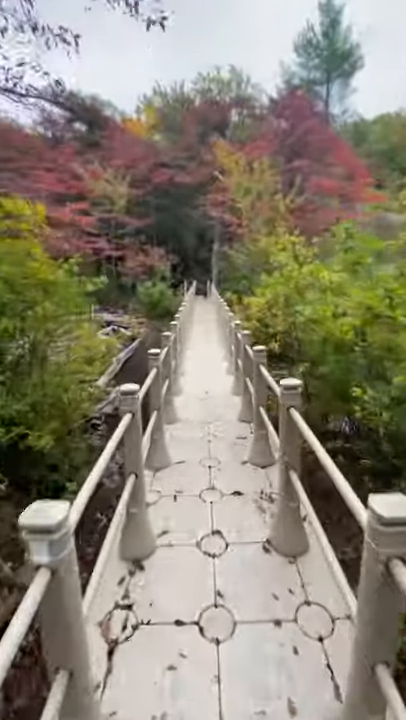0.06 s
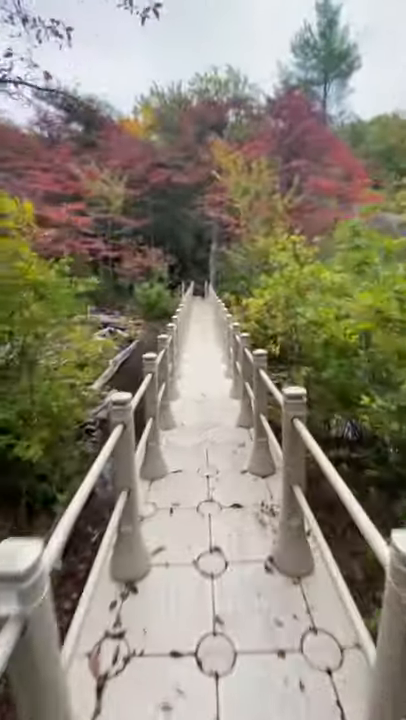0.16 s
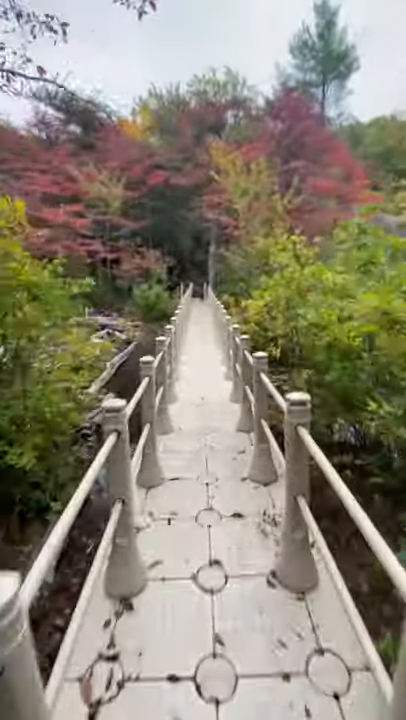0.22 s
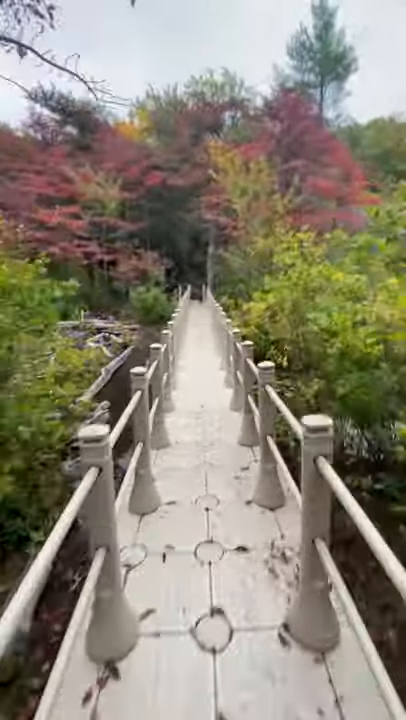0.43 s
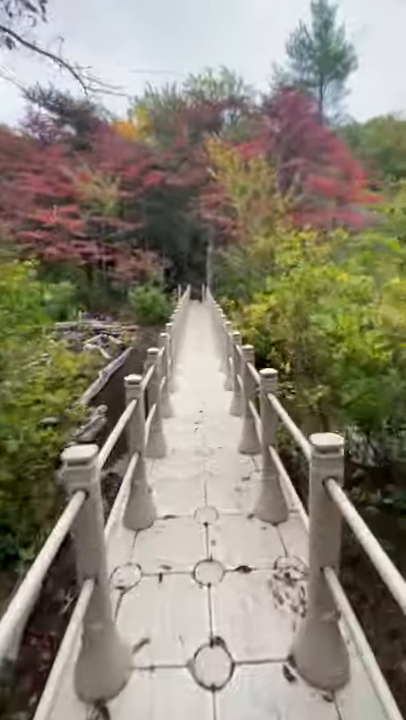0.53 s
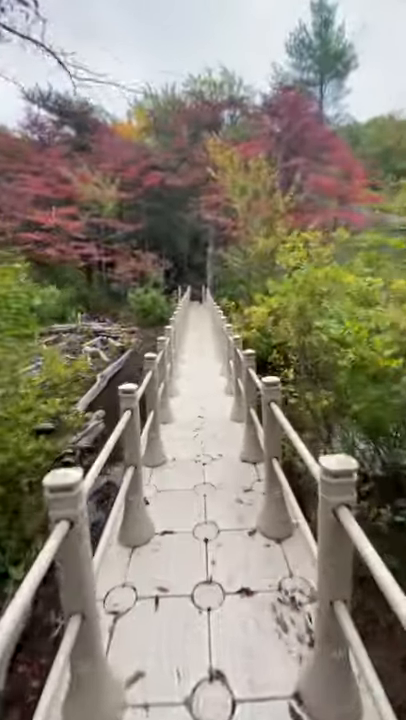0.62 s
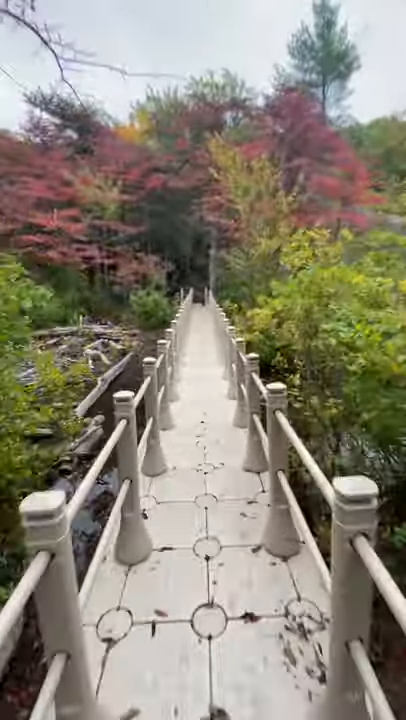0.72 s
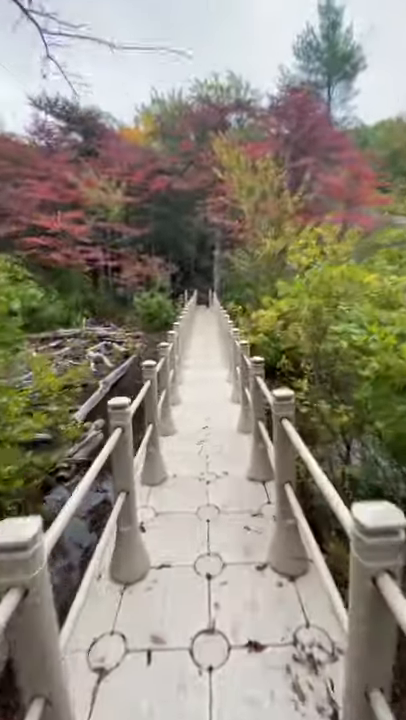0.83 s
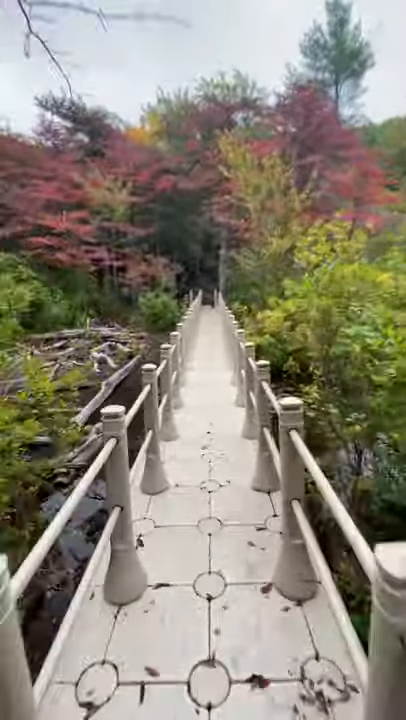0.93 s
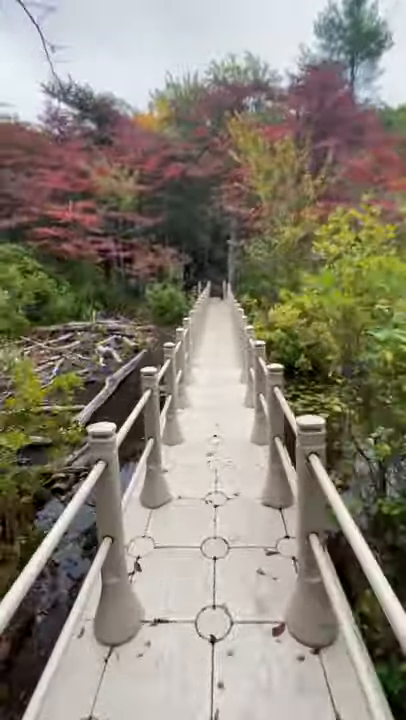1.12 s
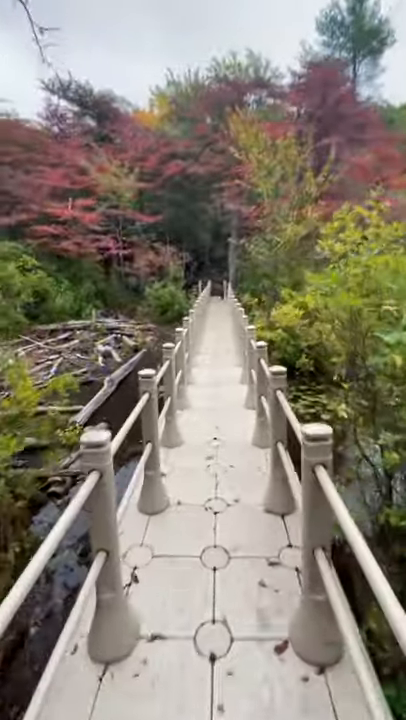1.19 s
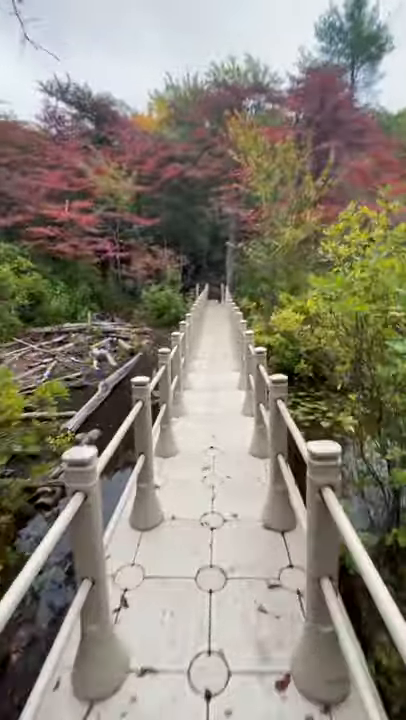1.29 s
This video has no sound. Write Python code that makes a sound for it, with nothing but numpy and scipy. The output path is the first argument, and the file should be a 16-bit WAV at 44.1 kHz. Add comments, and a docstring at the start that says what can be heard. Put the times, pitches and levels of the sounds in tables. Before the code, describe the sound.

Close footsteps in soft shoes land on hollow plastic decking, two main steps with low thumps, ticks and gritty scuffs; faint crickets trill steadily across an open marsh, heard by a hand-held stereo microphone.

```python
"""Soft shoes on a floating walkway

A hand-held stereo microphone follows soft shoes over hollow plastic pontoons on a marsh.
Soles push on the deck and ring its modes; heel knocks and ticks of joints and grit are decaying tones
with cracks of noise; shaped noise makes the scuffs, grit hiss, squeaks, shudder, rustle and air.
Crickets are bursts of falling tone: one steady near 5 kHz, one uneven near 6 kHz, a blurred chorus behind."""
import sys
import numpy as np
from scipy import signal
from scipy.fft import rfft, irfft, next_fast_len
from scipy.io import wavfile
from scipy.ndimage import map_coordinates

SR = 44100
rng = np.random.default_rng(int(sys.argv[2]) if len(sys.argv) > 2 else 0)


def inscribe(sig):
    """Save sig as 16-bit PCM at rate SR to the path in sys.argv[1].

    A 1-D sig is mono; a 2-D sig holds one channel per row.
    Samples are clipped to [-1, 1] before scaling.
    """
    pcm = np.round(np.clip(np.atleast_2d(sig).T, -1, 1) * 32767)
    wavfile.write(sys.argv[1], SR, pcm.astype(np.int16))


def ratio(d):
    """dB to gain"""
    e = np.asarray(d, float) / 20
    return 10 ** e


N = 59535
T = np.arange(N) / SR


def unit(x):
    """Scaled to rms 1."""
    return x / np.sqrt(np.mean(x ** 2) + 1e-20)


def along(points, hz):
    """Reads (pitch_hz, value) points on a log pitch axis."""
    f, v = np.transpose(points)
    return np.interp(np.log(hz + 1), np.log(f + 1), v)


def curve(rows):
    """Reads (time_s, value) points as one value per sample."""
    return np.interp(T, *np.transpose(rows))


def wobble(rate):
    """A smooth random curve with this many knots a second."""
    return map_coordinates(rng.standard_normal(int(N * rate / SR) + 4), [T * rate])


def waver(level_db, rate):
    """Gain around a level in dB, wandering at random."""
    return ratio(level_db + 1.5 * wobble(rate))


def swell(start_s, length_ms):
    """A smooth rise and fall from 0 to 1 and back."""
    return np.sin(np.pi * np.clip((T - start_s) * 1000 / length_ms, 0, 1)) ** 2


def place(x, pan_db):
    """Sets the level of left over right, from mono or stereo."""
    return x * ratio([[pan_db / 2], [-pan_db / 2]])


# likeness of the left and right channels: pitch_hz, likeness (-1 opposite, 1 same)
ALIKE = [(60, 0.53), (160, 0.85), (400, 0.82), (1040, 0.39), (2700, 0.21), (6990, 0.14)]


def hiss(spectrum, alike=ALIKE, tilt_db=0.):
    """Stereo noise of rms 1: likeness sets the share of mid and side, tilt is per octave."""
    m = next_fast_len(N + 8192)
    hz = np.fft.rfftfreq(m, 1 / SR)
    turn = np.arccos(np.clip(along(alike, hz), -1, 1)) / 2
    gain = ratio(along(spectrum, hz) + tilt_db * np.log2(hz / 1000 + 0.0069))
    noise = rfft(rng.standard_normal((2, m)))
    mid, side = irfft(noise * gain * [np.cos(turn), np.sin(turn)], m)[:, :N]
    return unit(np.array([mid + side, mid - side]))


# how long the marsh echoes: pitch_hz, decay_s (to -60 dB)
MARSH = [(100, 0.1), (1000, 0.65), (8000, 0.24)]


def echo(x):
    """Scatter from rails, water and bushes: a stereo noise tail whose decay depends on pitch."""
    hz, t, z = signal.stft(rng.standard_normal((2, SR // 4)), SR, nperseg=256)
    fade = ratio(-60 * t / along(MARSH, hz)[:, None])
    tail = signal.istft(z * fade, SR, nperseg=256)[1]
    return signal.fftconvolve(x[None], tail / np.linalg.norm(tail[0]), axes=1)[:, :N]


# shudder of the walkway: time_s, level_db (rms before panning)
SWAY = [(0.0, -59), (0.372, -51.5), (0.522, -61.5), (0.77, -54), (0.906, -47), (0.95, -60), (1.082, -55),
        (1.35, -56)]
# its spectrum: pitch_hz, level_db (per Hz, before scaling)
SHUDDER = [(20, -48), (35, 4), (55, -1), (90, -1), (125, -10), (170, -2.5), (215, -11.5), (280, -20),
           (500, -50), (1000, -120)]


def shudder():
    """The walkway keeps shuddering: low noise on a wandering level curve, slightly left."""
    return place(waver(curve(SWAY), 25) * hiss(SHUDDER), pan_db=1.6)


# soft rustle that follows the walking: time_s, level_db (rms)
RUSTLE = [(0, -53), (.03, -71.5), (.17, -87), (.3, -62), (.45, -68.5), (.6, -63.5), (.85, -63.5),
          (.96, -69), (1.05, -63.5), (1.15, -69), (1.28, -69), (1.35, -58)]
# its spectrum: pitch_hz, level_db (per Hz, before scaling)
RUSTLE_TONE = [(130, -45), (220, -8), (452, -5.5), (475, -3.5), (519, -6.5), (636, -11.5), (703, -12),
               (839, -16), (1460, -23), (2330, -23.5), (4500, -22), (5850, -54), (9900, -120)]


def rustle():
    """Shaped noise on a wandering level curve."""
    return waver(curve(RUSTLE), 40) * hiss(RUSTLE_TONE)


# faint narrow band that swells between the steps: time_s, level_db (rms)
BAND = [(0, -73), (.2, -95), (.35, -76.5), (.6, -69), (.72, -68.5), (.9, -103), (1.03, -63.5), (1.12, -83),
        (1.35, -105)]
# its spectrum: pitch_hz, level_db (per Hz, before scaling)
BAND_TONE = [(900, -57), (1300, -9), (1550, 0), (1800, -6.5), (2600, -58)]


def faint_band():
    """Narrow noise that comes and goes."""
    return waver(curve(BAND), 23) * hiss(BAND_TONE, [(1000, 0.31)])


# low rush heard wide: pitch_hz, level_db (per Hz, before scaling)
WIDE_TONE = [(20, -20), (45, 7), (100, -14), (200, -28.5), (500, -18), (1000, -25), (1500, -39),
             (3000, -42.5), (6000, -93)]


def wide_rush():
    """Low noise nearly opposite in the two channels, wavering slightly."""
    return waver(-58.5, 11.0) * hiss(WIDE_TONE, [(1000, -0.99)])


# still air over the marsh: pitch_hz, level_db (per Hz, before scaling)
AIR_TONE = [(530, -58), (900, -34), (1120, -59), (1630, -26), (1720, -15), (1860, -26.5), (2030, -19),
            (3510, -20.5), (4120, -21), (5130, -7.5), (6130, -2.5), (7440, -24.5), (9670, -33.5),
            (12500, -25.5), (15500, -58), (16400, -120)]
# its left-right likeness: pitch_hz, likeness
AIR_ALIKE = [(1000, -0.078), (5000, -0.33), (8000, 0.53), (10500, -0.9)]


def still_air():
    """Steady noise with a fixed spectrum."""
    return ratio(-61.5) * hiss(AIR_TONE, AIR_ALIKE)


def wing_strokes(starts_s, peaks_db, hz, fall_hz, length_s):
    """Each stroke is a smooth burst of tone whose pitch falls by fall_hz, centred on hz."""
    u = np.arange(round(length_s * SR))[None] / (length_s * SR)
    turns = length_s * (np.reshape(hz, (-1, 1)) * u + fall_hz * (u - u * u) / 2)
    turns = turns + rng.random((len(starts_s), 1))
    bursts = ratio(peaks_db)[:, None] * np.sin(np.pi * u) ** 2 * np.sin(2 * np.pi * turns)
    at = np.clip(np.round(starts_s * SR).astype(int)[:, None] + np.arange(u.size), 0, N)
    return np.bincount(at.ravel(), bursts.ravel(), N + 1)[:N]


def far_strokes():
    """One layer of distant strokes at random times, levels and pitches."""
    count = int(500 * N / SR)  # 500 strokes a second
    starts_s = rng.random(count) * N / SR
    levels_db = 4 * rng.standard_normal(count)
    pitch_hz = 6208 + 180 * rng.standard_normal(count)
    return wing_strokes(starts_s, levels_db, pitch_hz, fall_hz=810, length_s=0.01)


def cricket_chorus():
    """Many far singers blur together: one layer is shared, one is left only and one right only."""
    shared, left, right = far_strokes(), far_strokes(), far_strokes()
    chorus = unit(np.array([shared + 0.56 * left, shared + 1.8 * right]))
    return place(ratio(-61.5) * chorus, pan_db=-2.4)


# strokes of the uneven singer: time_s (2 ms after the stroke starts), level_db (peak before panning)
UNEVEN = [(0.0392, -49), (0.077, -47.5), (0.1134, -49.5), (0.139, -50), (0.1795, -52), (0.2098, -51.5),
          (0.2478, -63), (0.2733, -49), (0.3135, -51), (0.3396, -47), (0.3804, -47.5), (0.407, -46),
          (0.4416, -58), (0.4717, -53), (0.5077, -49.5), (0.5428, -47.5), (0.5801, -46.5), (0.6158, -46.5),
          (0.6429, -47.5), (0.6806, -49), (0.7466, -57), (0.8087, -50.5), (0.871, -55), (0.9122, -50.5),
          (0.9376, -53), (0.9752, -51), (1.0003, -52), (1.039, -50.5), (1.065, -51.5), (1.1068, -51),
          (1.1325, -49.5), (1.169, -48), (1.2018, -49.5), (1.267, -50.5)]


def uneven_cricket():
    """Irregular strokes near 6 kHz."""
    time_s, level_db = np.transpose(UNEVEN)
    return wing_strokes(time_s - .002, level_db, hz=5966, fall_hz=890, length_s=0.0099)


# level of the steady singer: time_s, level_db (mean stroke peak before panning)
STEADY = [(0, -53.5), (.27, -60.5), (.38, -56), (.7, -58.5), (.85, -61), (1.05, -74), (1.2, -62.5),
          (1.35, -72)]


def steady_cricket():
    """Regular strokes near 5 kHz with small random timing and level."""
    first_s, per_s, length_s = .0153, 58.1, 0.013  # first is the middle of a stroke
    beats = first_s - length_s / 2 + np.arange(78) / per_s
    chance = rng.standard_normal((len(beats), 2))
    starts_s = beats + 0.00053 * chance[:, 0]
    levels_db = np.interp(beats, *np.transpose(STEADY)) + 1.4 * chance[:, 1]
    return wing_strokes(starts_s, levels_db, hz=5162, fall_hz=800, length_s=length_s)


def crickets():
    """Two singers to the right, with scatter from the marsh, and many far ones."""
    steady, uneven, chorus = steady_cricket(), uneven_cricket(), cricket_chorus()
    steady = place(steady, pan_db=-3) + ratio(-9.0) * echo(steady)
    uneven = place(uneven, pan_db=-4.5) + ratio(-6) * echo(uneven)
    return steady + uneven + chorus


# thin high squeaks of the sole: start_s, level_db (noise rms before the swell), pitch_hz, length_ms
SQUEAKS = [(0.608, -67, 10500, 6.5), (.795, -61.5, 10800, 11), (0.943, -59.5, 10000, 23)]


def squeaks():
    """Narrow noise around the pitch under a smooth swell."""
    out = np.zeros((2, N))
    for start_s, level_db, hz, length_ms in SQUEAKS:
        band = [(hz * .6, -90), (hz * .93, -14), (hz, 0), (hz * 1.08, -16), (hz * 1.5, -90)]
        out += ratio(level_db) * swell(start_s, length_ms) * hiss(band, [(1000, -0.75)])
    return out


# dry grit hissing under the sole: start_s, level_db (before swell and roughness), length_ms
GRIT = [(.22, -67, 53), (0.479, -76.5, 130), (0.698, -65, 65), (.75, -70.5, 130), (1.32, -78, 40)]
# its spectrum: pitch_hz, level_db (per Hz, before scaling)
GRIT_TONE = [(3000, -31), (5000, -12), (7500, -22), (10000, 4), (12500, 3), (15500, -18), (16000, -90)]


def grit():
    """Bright noise, roughened at random, under smooth swells."""
    swells = sum(ratio(level_db) * swell(start_s, length_ms) for start_s, level_db, length_ms in GRIT)
    rough = ratio(3.6 * wobble(400))
    return swells * rough * hiss(GRIT_TONE, [(8000, .3), (11500, -.85)])


# scuffs of the sole: start_s, level_db (rms before the envelope), hold_ms, decay_ms (to -60 dB),
# tilt_db (per octave)
SCUFFS = [(0.188, -50, 9.9, 190, 1.5), (0.225, -49.5, 13, 150, 3.5), (0.245, -39.5, 4, 220, 2),
          (0.523, -50.5, 18, 50, -11), (0.711, -56.5, 25, 56, 6), (0.728, -49, 9.4, 150, 0.5),
          (0.766, -52.5, 88, 260, -2.5), (0.879, -50.5, 16, 130, -4), (0.913, -46, 5.8, 84, 0),
          (0.99, -53.5, 6.5, 83, 2), (1.023, -59.5, 26, 220, 1), (1.332, -50, 5.7, 83, 2.4)]
# spectrum of the rubbing sole: pitch_hz, level_db (per Hz, before tilt and scaling)
SOLE = [(150, -25.5), (250, 1.5), (494, -3.5), (705, -4.5), (1140, -13.5), (1560, -19), (1880, -15.5),
        (2230, -19.5), (5140, -33), (7440, -35), (9670, -47), (16400, -120)]
# its left-right likeness: pitch_hz, likeness
SOLE_ALIKE = [(250, 0.95), (600, 0.31), (1200, 0.22), (2000, 0.91), (4000, 0.23), (9000, .2)]


def scuffs():
    """Gritty noise with a quick start, a hold and a decay, slightly left."""
    out = np.zeros((2, N))
    for start_s, level_db, hold_ms, decay_ms, tilt_db in SCUFFS:
        t = np.clip(T - start_s, 0, None)
        held = np.clip(t - hold_ms / 1000, 0, None)
        shape = (1 - np.exp(-t / 0.0014)) * ratio(level_db - 60000 * held / decay_ms)
        rough = ratio(2.5 * wobble(500))
        out += shape * unit(rough * hiss(SOLE, SOLE_ALIKE, tilt_db))
    return place(out, pan_db=2.4)


# how the two microphone ports hear close knocks and ticks: pitch_hz, balance_db (left over right)
PORT_BALANCE = [(150, 1.5), (800, 8), (1240, .5), (7000, -2)]
# and their phase: pitch_hz, lead_rad (left ahead of right)
PORT_LEAD = [(200, 0), (1030, .9), (1600, 0), (2200, .2), (3300, 1.5), (7000, 1.2)]


def ports(x):
    """Mono to stereo with a level and a phase difference that depend on pitch."""
    m = next_fast_len(N + 8192)
    hz = np.fft.rfftfreq(m, 1 / SR)
    half = ratio(along(PORT_BALANCE, hz) / 2) * np.exp(.5j * along(PORT_LEAD, hz))
    return irfft(rfft(x, m) * np.array([half, 1 / half]), m)[:, :N]


# knocks of the heel on the deck (low rows) and ticks of joints and grit: start_s,
# level_db (ring peak before rise and decay), pitch_hz, decay_ms (to -60 dB),
# crack_db (crack rms over ring peak, before the envelope)
KNOCKS_AND_TICKS = [(0.188, -52, 460, 50, -10.5), (.189, -49, 808, 50, -14), (0.194, -48, 1000, 87, -19),
                    (0.194, -48, 2190, 28, -7), (.192, -48.5, 298.3, 200, -31), (.208, -44, 290, 200, -21),
                    (0.23, -46.5, 2030, 14, 4.5), (0.231, -41.5, 3800, 7.8, 5),
                    (0.238, -41, 3320, 31, -0.5), (.248, -27.5, 1910, 22, -17), (.252, -39, 660, 58, -19),
                    (0.334, -44.5, 2870, 24, -2), (.335, -49, 2240, 14, -9),
                    (0.7255, -43.5, 469.3, 177, -8), (0.7255, -38.5, 876, 23, -15),
                    (0.727, -49.5, 1849, 29, -3), (0.732, -48.5, 1108, 97, -5.5),
                    (0.733, -49, 1862, 53, -7), (.765, -57, 1920, 12, 1), (.772, -47, 2070, 9.2, -8),
                    (0.814, -50, 1910, 21, -25), (0.818, -32, 210, 43, -14.5),
                    (0.853, -42, 2870, 15.3, -9.5), (0.851, -48, 2100, 14, -2),
                    (0.915, -41.5, 2160, 10.6, 0.5), (0.916, -48, 4230, 9.6, 0.5),
                    (0.917, -46.5, 946, 11.7, -2.5), (0.971, -49.5, 1480, 5.3, 6), (.991, -49, 2706, 51, 0),
                    (.992, -52, 806, 62, -4), (1.173, -55, 2000, 26, -30), (1.307, -56, 2020, 41, -11)]


def knocks_and_ticks():
    """A decaying partial and a wide crack of noise around it."""
    out, t = np.zeros(N + SR), np.arange(SR // 10) / SR
    for start_s, level_db, hz, decay_ms, crack_db in KNOCKS_AND_TICKS:
        band = signal.butter(3, [hz / 2.07, hz * 1.5], "band", fs=SR, output="sos")
        noise = signal.sosfilt(band, np.sign(rng.standard_normal(len(t))))
        edge = signal.sosfilt(band, t == t[SR // 2000])  # one hard click, 0.5 ms in
        crack = ratio(crack_db) * unit(noise + 9 * edge)
        shape = ratio(level_db - 60000 * t / decay_ms) * (1 - np.exp(-(t / 0.0006) ** 2))
        out[round(start_s * SR):][:len(t)] += shape * (np.sin(2 * np.pi * hz * t) + crack)
    return out[:N]


# thumps of the sole on the deck: start_s, level_db (force), contact_ms
THUMPS = [(.002, -49.5, 4.9), (0.206, -50, 1.7), (0.252, -34, 2.36), (0.263, -31, 4.13),
          (0.303, -38.5, 1.88), (0.371, -49.5, 6.1), (0.746, -37, 4.85), (0.754, -39, 5.1),
          (0.786, -38.5, 5.3), (0.822, -37, 3.2), (0.849, -35.5, 8.4), (0.868, -35, 6.6), (0.898, -41.5, 3),
          (0.917, -34.5, 5.25), (1.007, -55, 0.83), (1.028, -50.5, 1.9), (1.267, -46, 10.4),
          (1.297, -48, 2.3)]
# modes of the hollow deck: pitch_hz, level_db, decay_s (to -60 dB)
DECK = [(61.5, 5.5, 0.067), (71.5, -13, 0.6), (90.07, 1.5, 0.27), (100, 1, 0.12), (161.4, -6, 0.13),
        (188.7, -13.5, 0.26), (237, -5, 0.15), (283.9, -2, 0.16), (400, -26, .1), (455.6, -9.5, 0.16),
        (670, -21.5, .07), (800, -34, 0.093), (1026, -3, .05)]


def thumps():
    """A soft push of the sole rings the deck; a short contact reaches the higher modes."""
    out, t = np.zeros(N + SR), np.arange(SR // 3) / SR
    for start_s, force_db, contact_ms in THUMPS:
        ring = np.zeros(len(t))
        for hz, level_db, decay_s in DECK:
            # level and phase vary a little from thump to thump
            fade = ratio(level_db + rng.normal(0, 1.0) - 60 * t / decay_s)
            ring += fade * np.sin(2 * np.pi * hz * t + rng.normal(0, hz / 900))
        ring *= 1 - np.exp(-t / 0.0014)
        push = np.sin(np.pi * np.clip(t[:SR // 50] * 1000 / contact_ms, 0, 1)) ** 2
        thump = signal.fftconvolve(ring, push / push.sum())[:len(t)]
        out[round(start_s * SR):][:len(t)] += ratio(force_db) * thump
    return out[:N]


def scene():
    """Steps underfoot, insects around, air and a shuddering walkway behind."""
    deck, close = thumps(), knocks_and_ticks()
    steps = place(deck, pan_db=2.5) + ratio(-15) * echo(deck)
    steps = steps + ports(close) + ratio(-18) * echo(close)
    steps = steps + scuffs() + grit() + squeaks()
    insects = crickets()
    background = shudder() + rustle() + faint_band() + wide_rush() + still_air()
    return steps + insects + background


def low_pass(x):
    """Removes everything above the highest recorded frequency."""
    return signal.sosfilt(signal.butter(12, 15780, fs=SR, output="sos"), x)


def record(dry):
    """The microphone's bass rolls off below 42.5 Hz."""
    rolloff = signal.butter(4, 42.5, "high", fs=SR, output="sos")
    mix = signal.sosfilt(rolloff, dry)
    return low_pass(mix)


dry = scene()
out = record(dry)
inscribe(out)
```